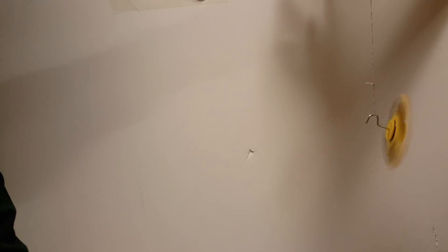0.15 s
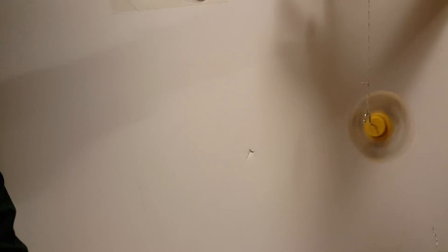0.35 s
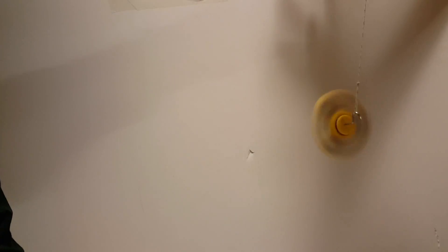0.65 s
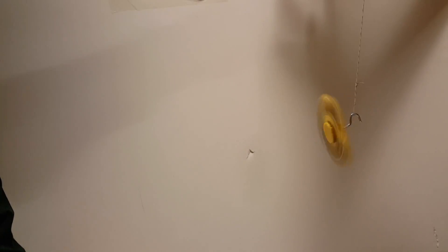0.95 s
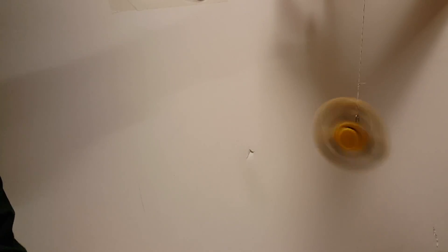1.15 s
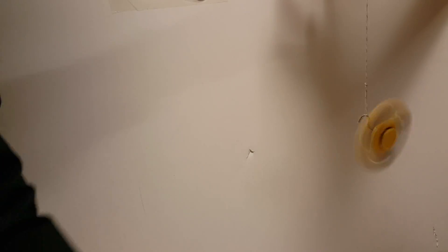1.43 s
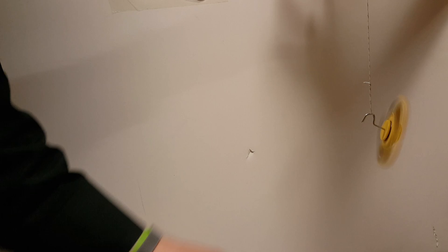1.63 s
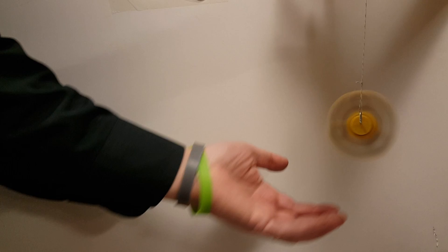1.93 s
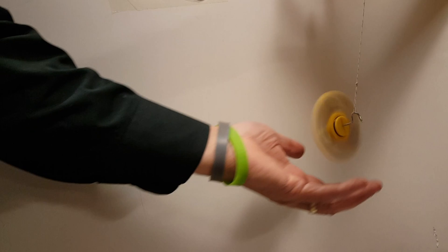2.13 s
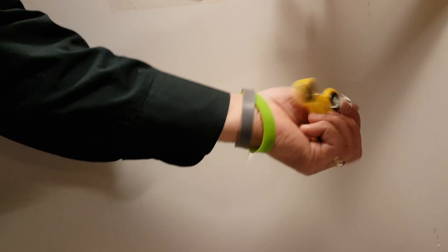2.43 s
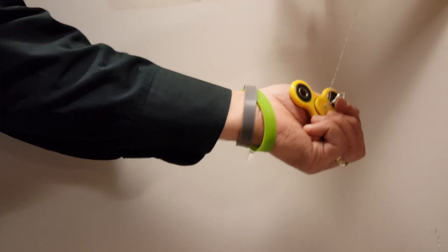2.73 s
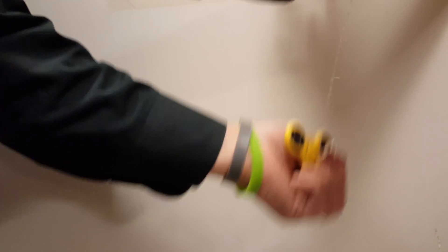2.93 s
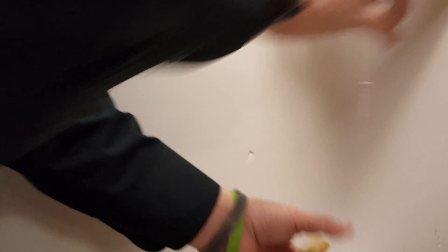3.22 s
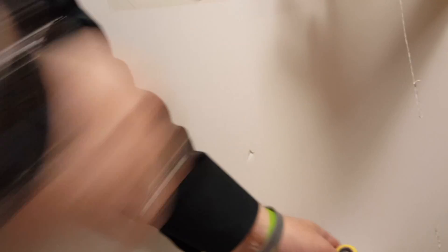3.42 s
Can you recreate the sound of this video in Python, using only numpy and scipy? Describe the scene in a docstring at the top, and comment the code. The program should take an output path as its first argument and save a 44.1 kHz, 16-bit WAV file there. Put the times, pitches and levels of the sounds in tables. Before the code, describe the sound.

A fidget spinner whirs faintly close by, its bearing giving a thin, wavering, ringing hiss with uneven ticks. At about 2.3 seconds a hand catches it with sharp clicks and soft thuds, and the whir dies by 2.5. From 2.9 seconds a sleeve swishes softly on the left, with small clicks near 3.2 and 3.4. Low ventilation rumble and a faint electrical buzz continue throughout.

```python
"""A small ball-bearing spinner whirs on a hook at the end of a string, turning slowly in a quiet room.
Its rough rolling balls hiss, tick and ring the races; the rings swing between two close microphone
ports as it turns. A hand catches it with a few sharp clicks and soft thuds, then a sleeve swishes
on the left as the arm reaches up. The room tone is ventilation rumble and a thin mains buzz."""
import sys
import numpy as np
from scipy import signal
from scipy.fft import rfft, irfft, next_fast_len
from scipy.io import wavfile
from scipy.ndimage import uniform_filter1d

SR = 44100
rng = np.random.default_rng(int(sys.argv[2]) if len(sys.argv) > 2 else 0)


def put_to_file(sound):
    """Save the sound as 16-bit audio at rate SR, in the file named by the first command-line argument."""
    columns = np.atleast_2d(sound).T  # one column per channel
    safe = np.clip(columns, -1, 1)
    whole_steps = np.round(safe * 32767)
    wavfile.write(sys.argv[1], SR, whole_steps.astype(np.int16))


N = 157437

# Resonances of the bearing races, the strongest last: f/Hz, width/Hz, relative gain/dB
RACE_RINGS = [(2680, 160, -26), (3420, 180, -22), (5220, 80, -18), (5415, 60, -16), (6550, 200, -16),
              (6960, 170, -9), (7630, 170, -8), (8100, 250, -14), (8800, 120, -8), (10250, 600, -14),
              (12530, 250, -22), (9050, 170, 0)]


def amp(db):
    return 10 ** (np.asarray(db) / 20)


def unit_rms(x):
    return x / np.sqrt(np.mean(x ** 2) + 1e-20)


def over_frequency(table, hz):
    """A table's values at hz, joined on a log-frequency axis."""
    f, value = np.transpose(table)
    return np.interp(np.log(hz + 1), np.log(f + 1), value)


def over_time(table, column):
    """One column of a timed table, joined by straight lines across the scene."""
    rows = np.array(table)
    return np.interp(np.arange(N) / SR, rows[:, 0], rows[:, column])


def sides(pan_db):
    """Left and right gains; pan is the left level minus the right."""
    return amp(np.array([pan_db / 2, -pan_db / 2]))


def drift(samples):
    """Random wander of unit spread, smoothed over the given span."""
    return unit_rms(uniform_filter1d(uniform_filter1d(rng.standard_normal(N), samples), samples))


def colour(x, spectrum):
    """Shapes x by a spectrum, to unit level."""
    gain = amp(over_frequency(spectrum, np.fft.rfftfreq(N, 1 / SR)))
    return unit_rms(irfft(rfft(x) * gain, N))


def resonate(x, modes):
    """Sum of two-pole resonances driven by x."""
    out = 0
    for hz, width, db in modes:
        r = np.exp(-np.pi * width / SR)
        feedback = [1, -2 * r * np.cos(2 * np.pi * hz / SR), r * r]
        out = out + amp(db) * signal.lfilter([1 - r, 0, r - 1], feedback, x)
    return out


def noise_pair(likeness, roughness, lag=0):
    """Rough noise at both ports; the part they share reaches the right one lag samples late."""
    left, other = rng.standard_normal((2, N)) * roughness
    return np.array([left, likeness * np.roll(left, lag) + np.sqrt(1 - likeness ** 2) * other])


def room_tone():
    """Ventilation rumble lifted by room resonances, and a faint hush; the ports agree most in the bass."""
    rumble_spectrum = [(12, -49), (20, -4.5), (37, -13), (65, 0.5), (81, 0.5), (108, -9.5), (184, 1),
                       (229, -10), (319, -5.5), (383, -10.5), (486, -8.5), (533, -13.5), (701, -13.5),
                       (768, -16), (958, -14.5), (1240, -23.5), (1600, -31), (2080, -43), (3520, -120)]  # ventilation: f/Hz, relative level/dB
    hush_spectrum = [(940, -22), (1600, -12), (1780, -12), (2240, -17.5), (2300, -10), (2840, -14),
                     (3010, -14), (3970, -18), (4760, -23.5), (8600, -28), (10400, -31), (15700, -25.5)]  # treble hush: f/Hz, relative level/dB
    room_modes = [(71.24, 5.2, 8.5), (149.7, 23, 4.5), (200, 30, 2.5), (255.4, 7.8, 8), (322, 8.5, 5),
                  (497.6, 6.1, 4.5)]  # room resonances: f/Hz, width/Hz, lift/dB
    port_likeness = [(40, .992), (120, .98), (240, .9), (480, .72), (700, .5), (950, .45), (1400, .45),
                     (2500, .3), (7500, .2), (15000, .2)]  # between the ports: f/Hz, coherence/1
    left_lead = [(30, 0.0), (250, -.1), (500, -.3), (800, -.8), (1100, -2.2), (1600, -2.2), (2500, -1.2),
                 (15000, -1.2)]  # phase between the ports: f/Hz, left lead/rad
    balance = [(60, -1), (120, 1), (240, 2.5), (480, 1.5), (950, 3.5), (1890, 3.0), (3770, 0), (7520, 2),
               (15000, -1)]  # balance of the room: f/Hz, pan/dB
    hz = np.fft.rfftfreq(N, 1 / SR)
    lift_db = sum(db / (1 + (2 * (hz - f) / width) ** 2) for f, width, db in room_modes)
    rumble = amp(-46) * unit_rms(amp(over_frequency(rumble_spectrum, hz) + lift_db))
    hush = amp(-66.5) * unit_rms(amp(over_frequency(hush_spectrum, hz)))
    shared, other = rfft(rng.standard_normal((2, N)))
    likeness = over_frequency(port_likeness, hz)
    left = shared * np.exp(1j * over_frequency(left_lead, hz))
    right = likeness * shared + np.sqrt(1 - likeness ** 2) * other
    return irfft(np.array([left, right]) * (rumble + hush) * sides(over_frequency(balance, hz)), N)


def mains_buzz(base_hz=119.92):
    """Steady multiples of twice the mains frequency, filling the room."""
    multiples = [4, 5, 6, 7, 8, 9, 10, 11, 12, 13, 14, 17, 18, 20, 23, 24]  # buzz partials: f/base_hz
    partials = [(-68, 4, -.2), (-71, -2, -1.2), (-67, -1, 0.0), (-76, 3, -.3), (-76, 1, -.6), (-73, 1, -.2),
                (-82, 0, -.1), (-73, 9, .6), (-77, 4, 3.0), (-82, 8, 1.1), (-84, 3, -1.2), (-80, 6, .7),
                (-86, 1, .1), (-85, 5, -.3), (-83.5, 1, -.7), (-79.5, -3, -1.3)]  # one row a multiple: level/dB, pan/dB, left lead/rad
    t = np.arange(N) / SR
    out = 0
    for k, (db, pan, lead) in zip(multiples, partials):
        phase = 2 * np.pi * (k * base_hz * t + rng.random()) + np.array([[lead], [0]])
        out = out + np.sqrt(2) * amp(db) * sides(pan)[:, None] * np.sin(phase)
    return out


def sleeve(fade_in_s=0.16):
    """Cloth slides on cloth as the arm lifts, left of the microphone, reaching the left port first."""
    weave = [(1470, -4), (2500, -3), (3560, -6.5), (4380, -7), (6640, -10), (8690, -7), (10200, -17),
             (15700, -18.5)]  # fine weave: f/Hz, relative level/dB
    folds = [(740, -21), (1250, -5.5), (1640, -4), (2870, -12.5), (3120, -12), (3610, -21), (4000, -16),
             (5200, -44), (8800, -120)]  # loose folds: f/Hz, relative level/dB
    swish = [(2.9, -60, -75), (3.02, -66.5, -68), (3.15, -66.5, -63.5), (3.28, -59, -65), (3.36, -58, -58),
             (3.43, -54.5, -51.5), (3.5, -59.5, -57.5), (3.57, -62.5, -56)]  # the arm's reach: t/s, weave level/dB, folds level/dB
    fade_in = np.clip((np.arange(N) / SR - swish[0][0]) / fade_in_s, 0, 1)
    cloth = 0
    for column, spectrum in enumerate([weave, folds], start=1):
        friction = noise_pair(likeness=0.43, roughness=amp(1.1 * drift(200)), lag=20)
        cloth = cloth + colour(friction, spectrum) * amp(over_time(swish, column))
    return cloth * fade_in * sides(pan_db=6.5)[:, None]


def palm_thuds(swell_s=0.0097):
    """Soft low pushes as the spinner lands in the hand, alike at both ports."""
    thuds = [(2.335, -47, 140.7), (2.405, -40.5, 78.4), (2.434, -45, 276)]  # settling into the palm: t/s, envelope peak/dB, f/Hz
    t = np.arange(N) / SR
    out = 0
    for start, db, hz in thuds:
        age = np.maximum(t - start, 0) / swell_s
        envelope = amp(db) * np.e * age * np.exp(-age)
        out = out + envelope * np.sin(2 * np.pi * hz * (t - start))
    return out


def knocks(hits, tail_s, tail_db, rise_s=0.0011, lesser_rings_db=22):
    """Short bright cracks with a quick echoing tail that ring the bearing and the plastic body."""
    body_modes = [(2410, 170, -14), (3400, 330, 5), (5900, 900, -8), (6550, 450, 1)]  # plastic lobes: f/Hz, width/Hz, relative gain/dB
    crack_band = signal.butter(2, [3000, 13500], "band", fs=SR)
    out, t = np.zeros((2, N)), np.arange(3000) / SR
    attack = np.minimum(t / rise_s, 1) ** 2
    for start, db, ring_db, pan, body_db, crack_ms in hits:
        decay = np.exp(-1000 * t / crack_ms) + amp(tail_db) * np.exp(-t / tail_s)
        left, other = rng.standard_normal((2, len(t)))
        burst = attack * decay * np.array([left, 0.6 * np.roll(left, 2) + 0.8 * other])
        knock = signal.lfilter(*crack_band, burst)
        knock += amp(ring_db) * resonate(burst, RACE_RINGS[-1:])
        knock += amp(lesser_rings_db) * resonate(burst, RACE_RINGS[:-1])
        knock += amp(body_db) * resonate(burst, body_modes)
        knock /= np.percentile(abs(knock), 99.8)  # peaks near one
        slot = out[:, round(start * SR):][:, :len(t)]
        slot += amp(db) * sides(pan)[:, None] * knock[:, :slot.shape[1]]
    return out


def catch_clicks():
    """The hand catches the spinner in a cluster of sharp clicks; later the hook clicks."""
    # Catch, then hook: t/s, level/dB, strongest ring gain/dB, pan/dB, body gain/dB, crack decay/ms
    clicks = [(2.3464, -39, 29, -8, -2, 1.7), (2.3516, -33.5, 22, -5, 9, 0.44),
              (2.3584, -42, 24, 15, 8, 1.5), (2.366, -27, 25, 5, 5, 0.92), (2.3795, -58, 21, -3, 1, 1.2),
              (2.4381, -36.5, 27, -3, -15, 0.4), (2.4428, -40, 17, -3, -8, 1.3),
              (2.4478, -50, 31, 6, -3, 1.2), (2.4838, -42, 23, -7, 6, 0.9), (2.4853, -33, 20, 0, 13, 1.1),
              (2.4932, -42, 14, 3, 7, 0.7), (2.5194, -56, 19, -2, 5, 1.4), (3.1877, -53, 17, 0, 7, 1.4),
              (3.4201, -40.5, 12, -6, 2, 1.4)]
    return knocks(clicks, tail_s=0.0089, tail_db=-20.5)


def bearing_ticks(body_db=6, crack_ms=2.4):
    """The running bearing ticks unevenly, each tick ringing the races and the body."""
    ticks = [(0.065, -40, 38, -1), (0.129, -54, 30, -8), (0.1672, -51, 20, -9), (0.2002, -42, 22, 1),
             (0.2448, -44, 28, -5), (0.401, -48, 30, -2.0), (0.445, -44.5, 30, -0.5), (0.529, -48, 30, 0),
             (0.6683, -40, 35, 10), (0.792, -51, 33, -1), (0.818, -50, 33, -1), (1.162, -51, 23, 0),
             (1.401, -46, 24, -1.5), (1.4185, -38, 32, -4), (1.4653, -43, 26, -5), (1.6066, -48, 20, -7),
             (1.685, -53, 31, -8), (1.81, -44, 32, 0.5), (1.8544, -42.5, 33, 0.5), (1.89, -45, 35, 0.5),
             (2.119, -47, 33, 2), (2.181, -47, 30, -1)]  # bearing ticks: t/s, level/dB, strongest ring gain/dB, pan/dB
    return knocks([(*tick, body_db, crack_ms) for tick in ticks], tail_s=0.0045, tail_db=-26)


def race_ring(mode, grit, lead):
    """One race resonance fed by rolling noise, ahead at the left port by lead radians."""
    left, right = unit_rms(resonate(noise_pair(likeness=0.7, roughness=grit), [mode]))
    ahead = signal.hilbert(left, next_fast_len(N))[:N] * np.exp(1j * lead)
    return np.array([ahead.real, right])


def rolling_grit(bumps_per_s=2500, bump_db=3.5):
    """Roughness of the rolling balls: a gain that jumps at each tiny random bump."""
    strength = amp(bump_db * np.minimum(rng.exponential(1, N), 5))
    bumps = strength * (rng.random(N) < bumps_per_s / SR)
    bump_rms = np.sqrt(abs(uniform_filter1d(bumps ** 2, 60)))
    return (0.61 + bump_rms) * amp(0.7 * drift(250))


def whir(grit, flutter_db=1.6):
    """Broad noise of the spin: air off the lobes, rasp of the cage and hiss of the balls."""
    lobe_air = [(1500, -10), (2000, -1), (2700, 1.5), (3300, 5), (4200, -51)]  # air off the lobes: f/Hz, relative level/dB
    cage_rasp = [(2400, -20), (3000, -12.5), (3500, 2), (4200, 0), (5500, -5.5), (6500, -24)]  # ball cage: f/Hz, relative level/dB
    ball_hiss = [(4000, -22.5), (5500, -19), (6100, -5.5), (7300, -5.5), (9400, -0.5), (11000, -6.5),
                 (13400, -8), (14500, -5), (15800, -8.5)]  # rolling balls: f/Hz, relative level/dB
    levels = [(0.0, -66, -67.5, -61), (0.17, -63, -63, -59), (0.37, -66.5, -68.5, -62),
              (0.77, -66.5, -64.5, -62), (0.88, -63, -63, -60), (1.0, -64.5, -62.5, -60),
              (1.3, -67.5, -68, -62), (1.66, -65, -66.5, -62.5), (1.84, -68, -67, -62),
              (2.29, -64, -66.5, -62), (2.35, -62, -61, -59), (2.4, -82, -67, -58.5)]  # course of the whir: t/s, air level/dB, rasp level/dB, hiss level/dB
    pans = [1, 0, -2]  # placing of air, rasp and hiss: pan/dB
    out = 0
    for k, spectrum in enumerate([lobe_air, cage_rasp, ball_hiss]):
        noise = noise_pair(likeness=0.093, roughness=grit * amp(flutter_db * drift(300)), lag=-2)
        out = out + colour(noise, spectrum) * amp(over_time(levels, k + 1)) * sides(pans[k])[:, None]
    return out


def spinner(turn_s=1.43, waver_db=3.5, stop_s=2.392, stop_decay_s=0.081):
    """The bearing whirs and rings, beamed past the microphone as it turns, until the hand stops it."""
    main_beam = [(0.0, -56, 0.0), (0.08, -60.5, 4), (0.43, -66, -3), (0.47, -55.5, 0), (0.57, -65, -4.0),
                 (0.6, -58, -8), (0.71, -62.5, -10), (0.75, -61, 1), (0.83, -57, 4), (0.89, -71, 10),
                 (1.03, -66, 3), (1.3, -67, 1), (1.37, -58, -3), (1.5, -65, 5), (1.92, -60, -1),
                 (2.09, -64, -6), (2.12, -58, -18), (2.16, -64, -9), (2.27, -72, -4), (2.33, -66, -6),
                 (2.39, -61, -6.5), (2.4, -69, -1)]  # strongest ring as the spinner turns: t/s, level/dB, pan/dB
    main_lead = [(0, -3), (.15, 1), (.35, 1.3), (.6, 4), (.74, -2), (.9, 5), (1.12, 2.5), (1.4, 1.8),
                 (1.65, -3), (2.03, 4), (2.2, -1.5), (2.4, 0.5)]  # its phase between the ports: t/s, left lead/rad
    # Beams of the lesser rings: level/dB, swing/dB, loudest at t/s, left lead/rad, sway/rad,
    # phase slip/cycles per turn
    lesser_beams = [(-75, 2, .9, 0.3, 0.1, 0), (-75, 2, .9, 0.3, 0.1, 0), (-81, 3, .1, -1.2, 0.1, 1),
                    (-81, 2, .3, -1.2, 0.1, 1), (-80, 3, .45, 1.2, 0.1, -1), (-73, 3, .6, 1.5, 0.1, -1),
                    (-71, 3, .2, 2.1, -1.2, 0), (-77, 2.5, .1, 1.5, -1.2, 0), (-72, 2.5, .1, 1.5, -1.2, 0),
                    (-76, 1.5, .2, 1.2, -1.9, 0), (-83, 2.5, .2, 1.2, 0.1, 0)]
    t = np.arange(N) / SR
    grit = rolling_grit()
    out = whir(grit)
    main_ring = race_ring(RACE_RINGS[-1], grit * amp(3.0 * drift(200)), over_time(main_lead, 1))
    out += main_ring * amp(over_time(main_beam, 1)) * sides(over_time(main_beam, 2))
    turn = 2 * np.pi * t / turn_s
    for mode, (db, swing_db, loudest_s, lead, sway, slip) in zip(RACE_RINGS, lesser_beams):
        facing = np.cos(turn - 2 * np.pi * loudest_s / turn_s)
        gain = amp(db + swing_db * facing + waver_db * drift(2200))
        out += gain * race_ring(mode, grit, lead + sway * facing + slip * turn)
    return out * np.exp(-np.maximum(t - stop_s, 0) / stop_decay_s)


def scene():
    """The room, the spinner and the catch as they reach the two ports."""
    room = room_tone() + mains_buzz()
    return room + spinner() + sleeve() + palm_thuds() + bearing_ticks() + catch_clicks()


def record(dry, dc_offset=-0.0006, edge_hz=15740):
    """The recorder adds a slight offset and cuts the top treble steeply."""
    low_pass = signal.firwin(1023, edge_hz, window=("kaiser", 9), fs=SR)
    return signal.oaconvolve(dry + dc_offset, low_pass[None], "same")


dry = scene()
out = record(dry)
put_to_file(out)
```